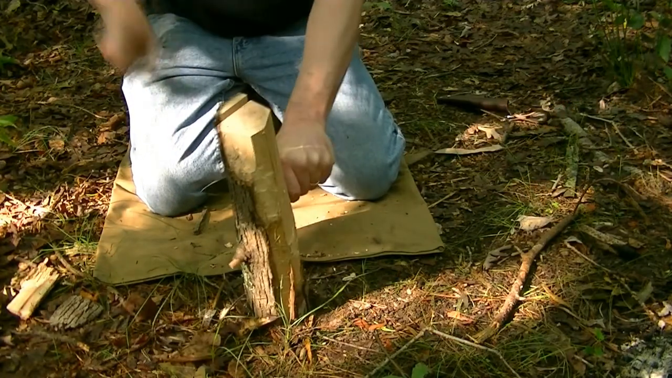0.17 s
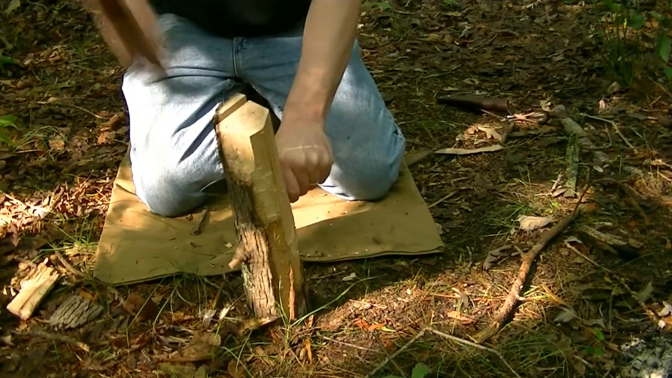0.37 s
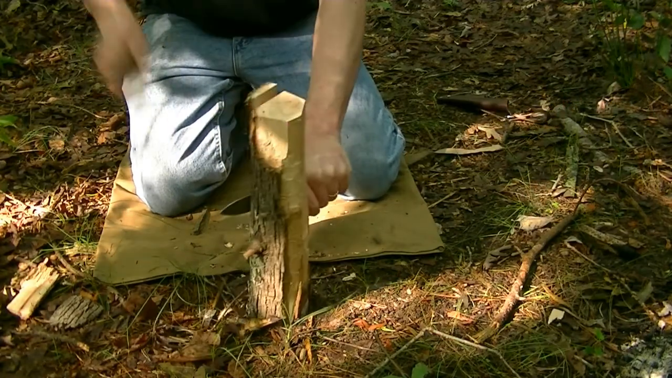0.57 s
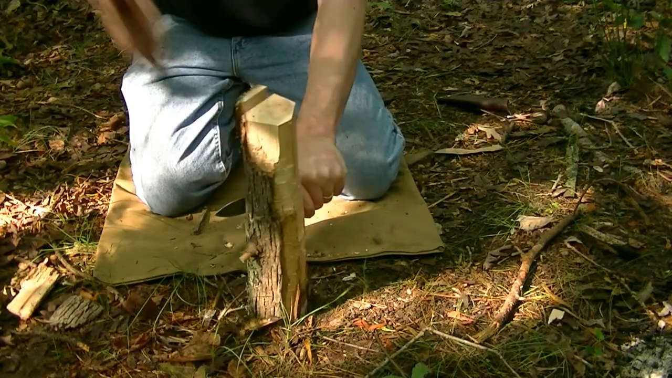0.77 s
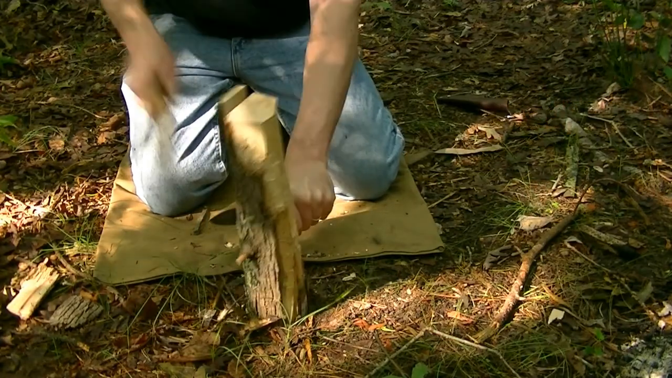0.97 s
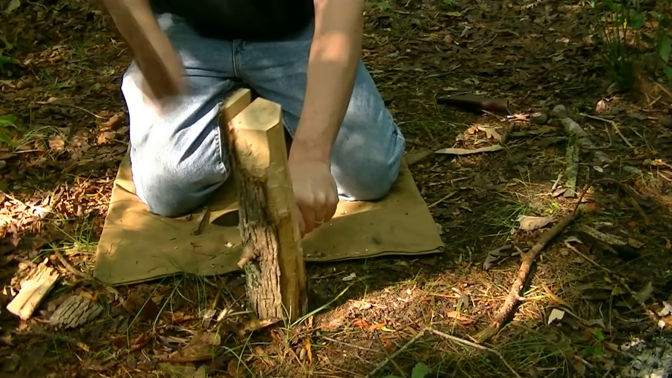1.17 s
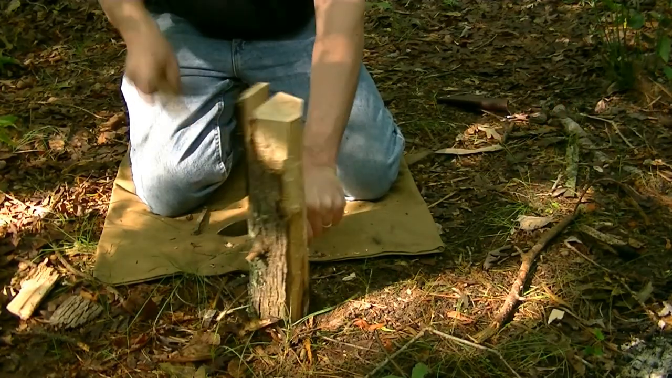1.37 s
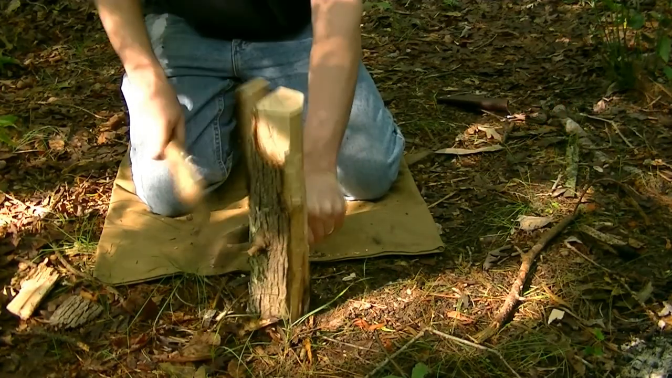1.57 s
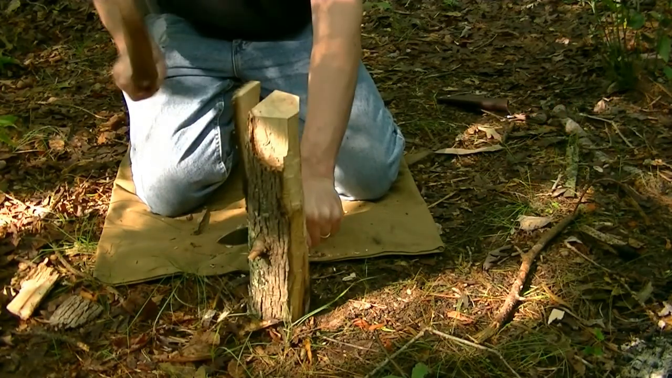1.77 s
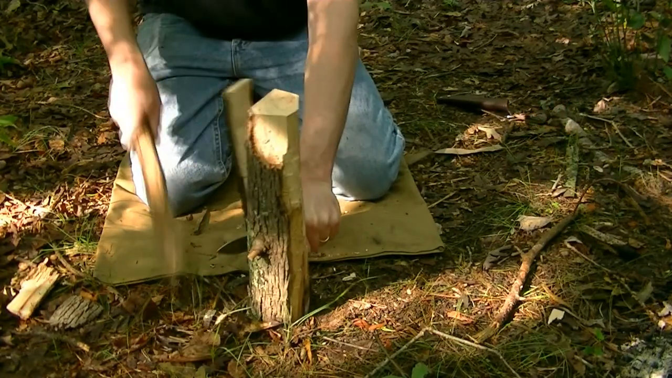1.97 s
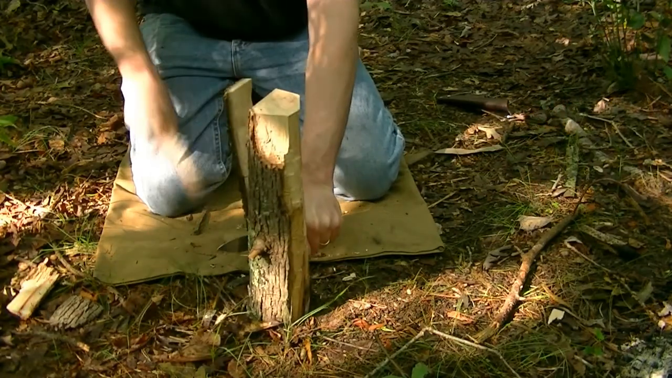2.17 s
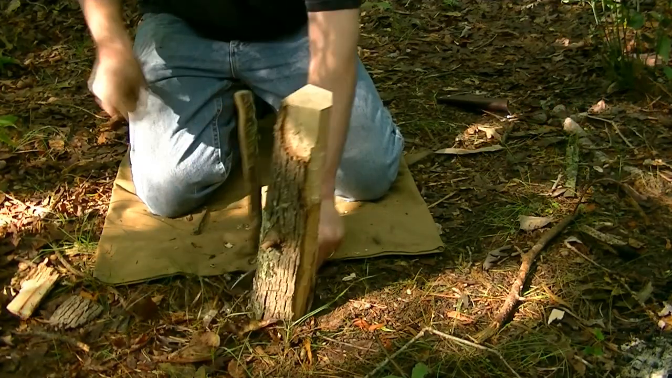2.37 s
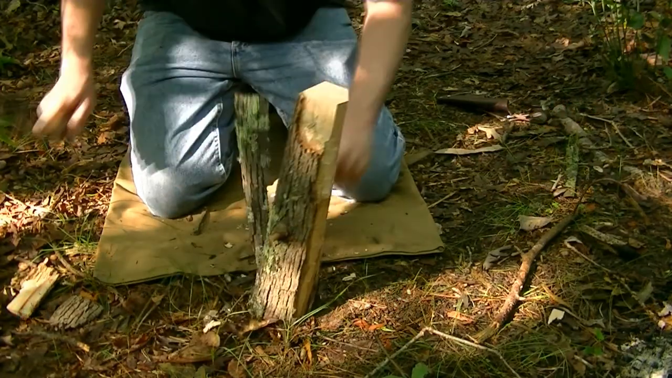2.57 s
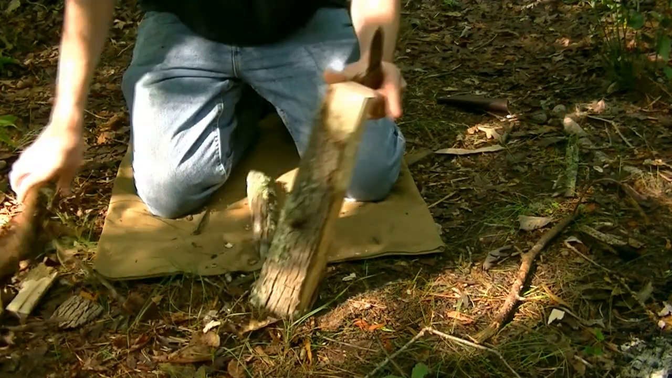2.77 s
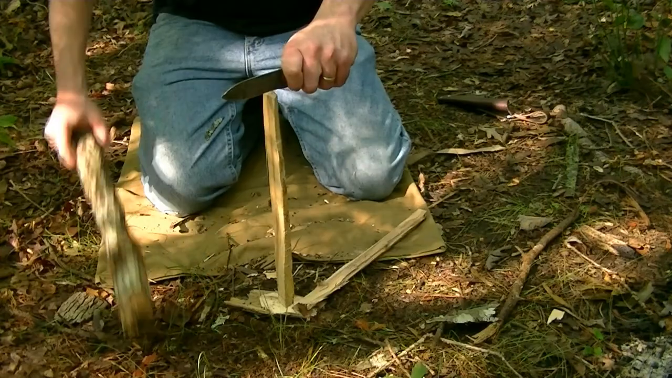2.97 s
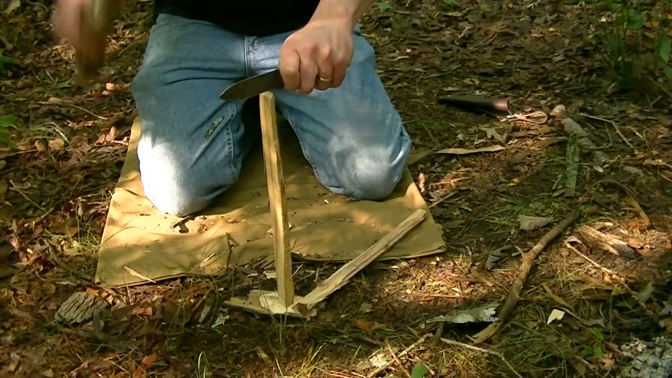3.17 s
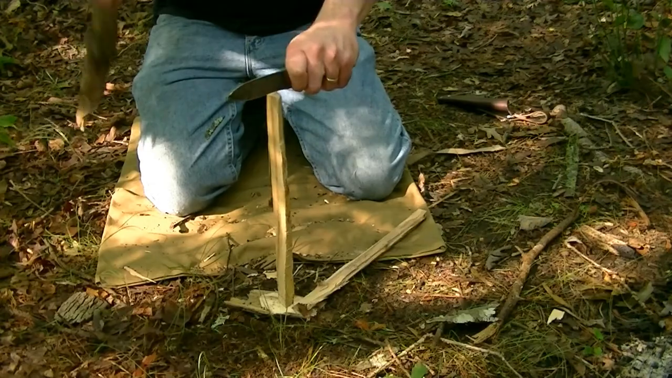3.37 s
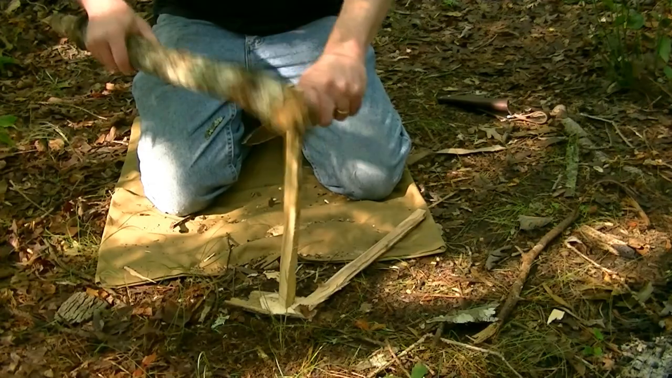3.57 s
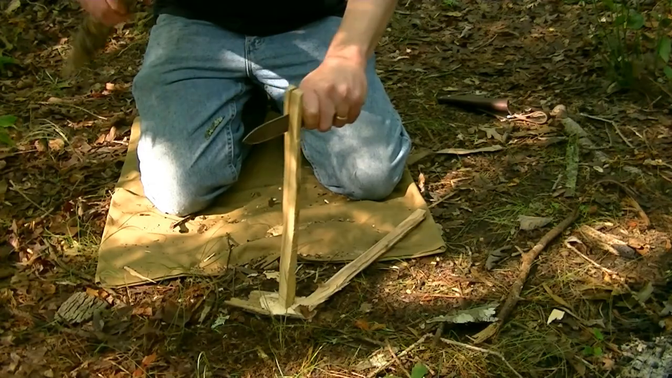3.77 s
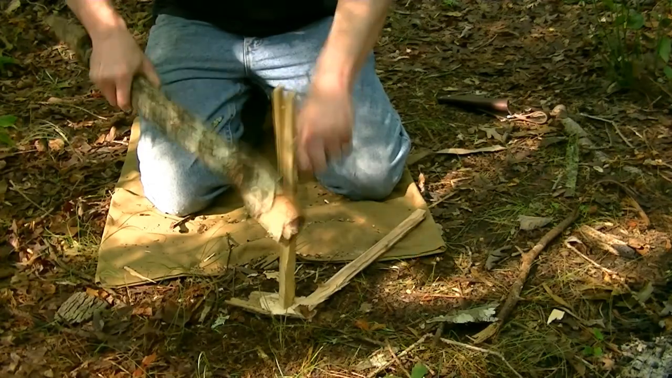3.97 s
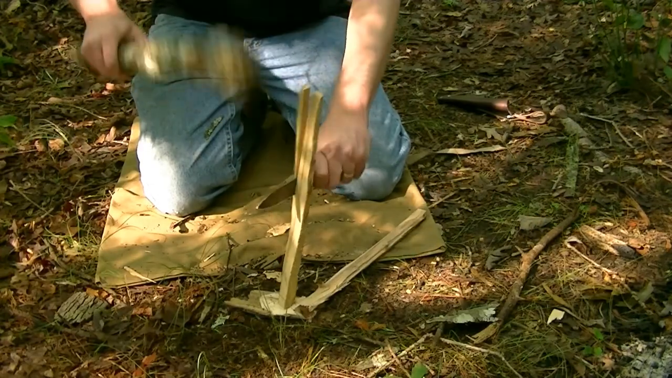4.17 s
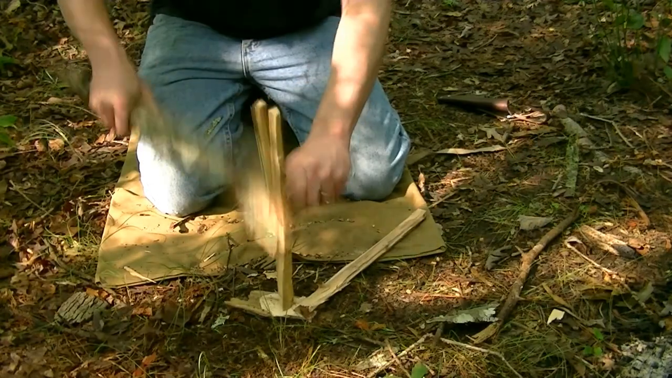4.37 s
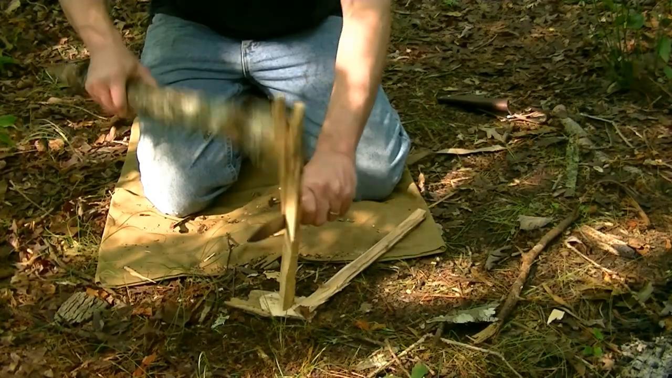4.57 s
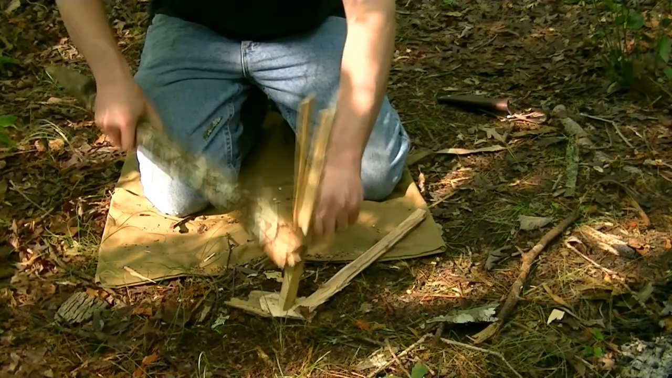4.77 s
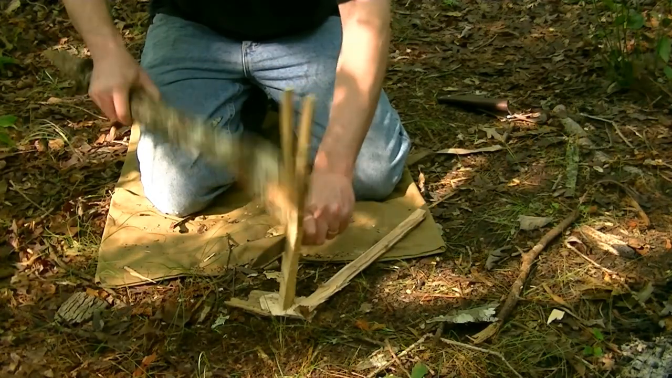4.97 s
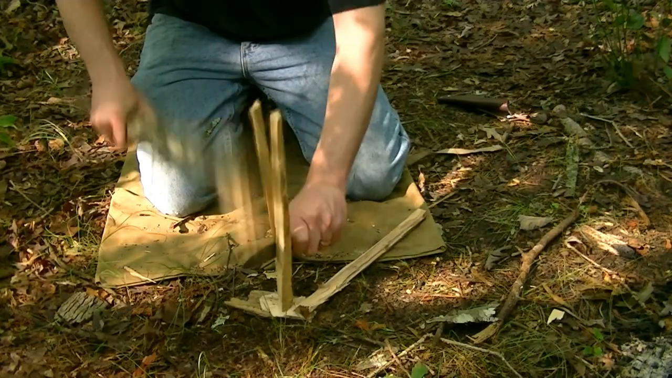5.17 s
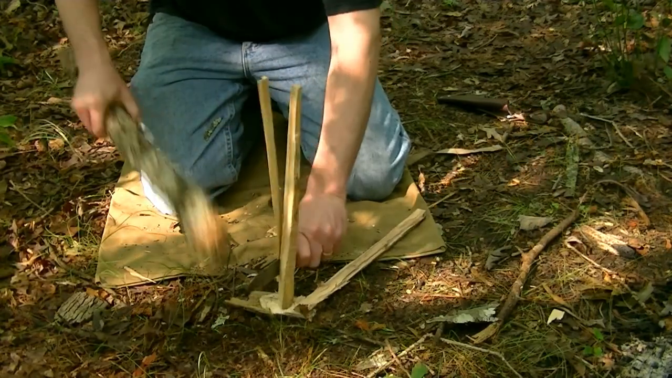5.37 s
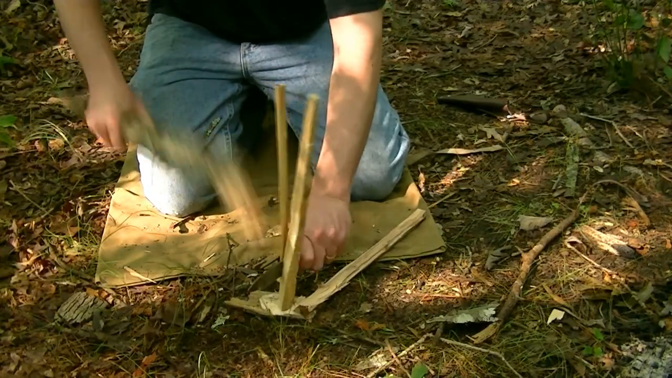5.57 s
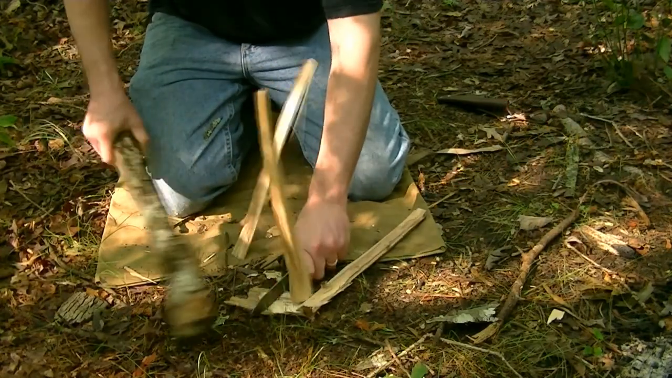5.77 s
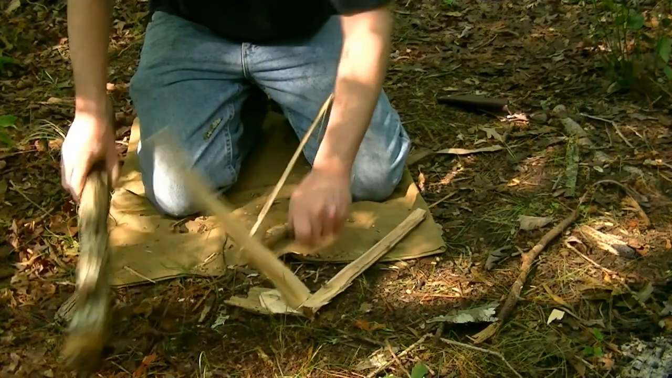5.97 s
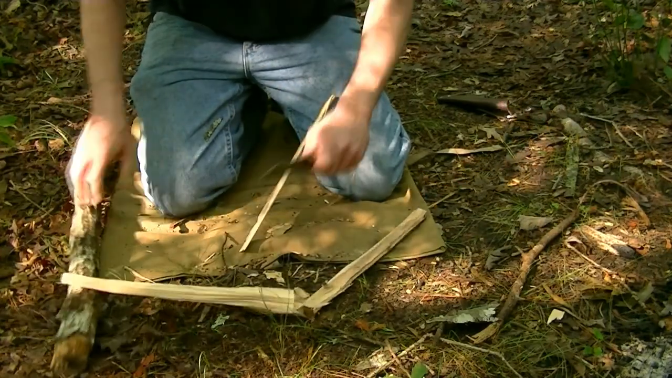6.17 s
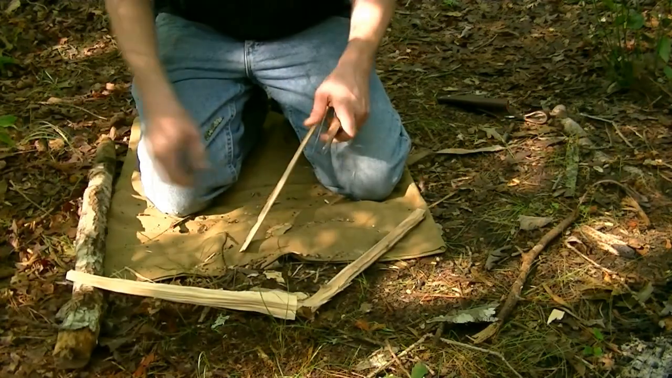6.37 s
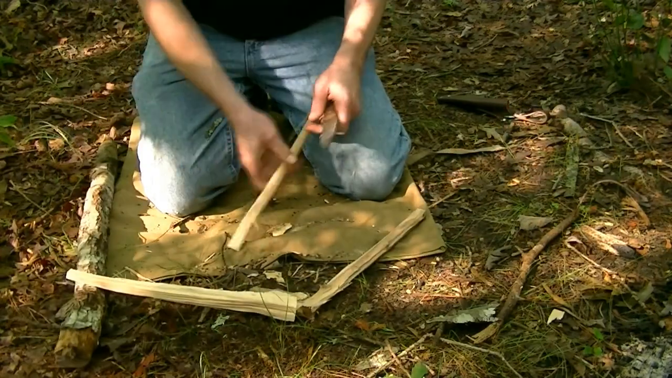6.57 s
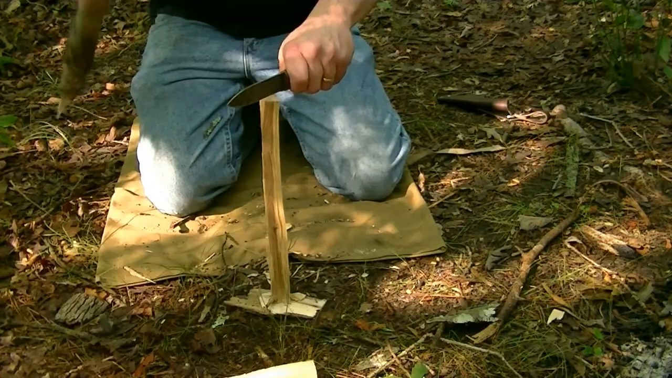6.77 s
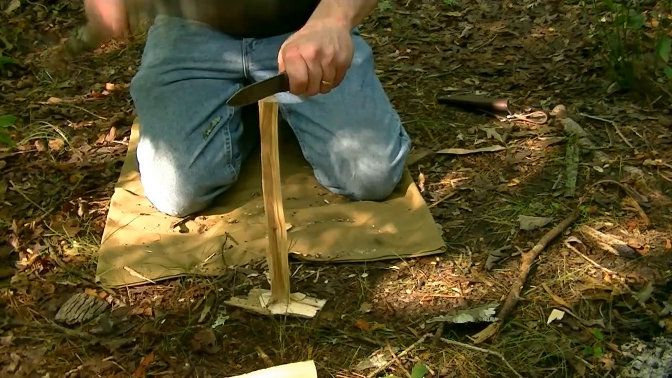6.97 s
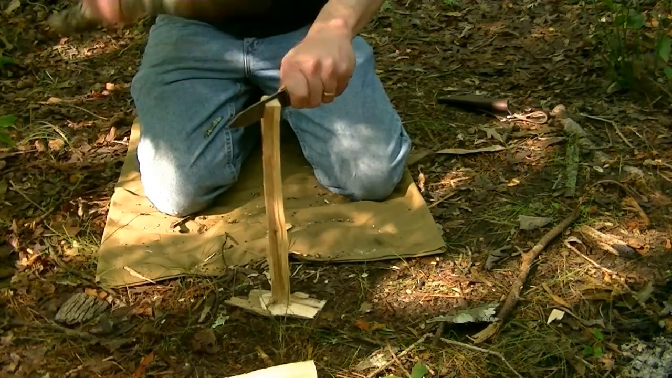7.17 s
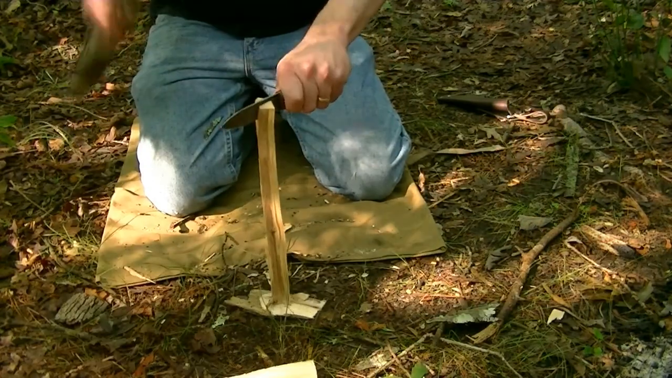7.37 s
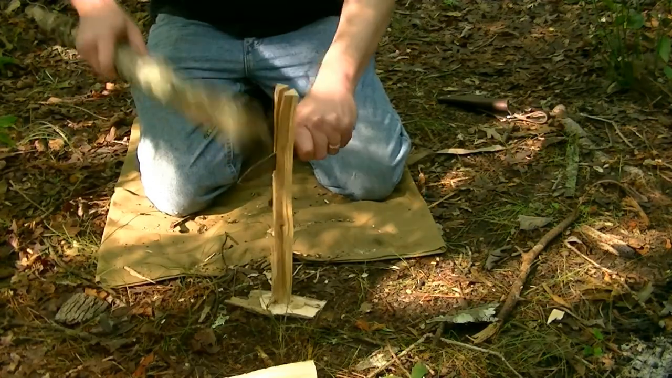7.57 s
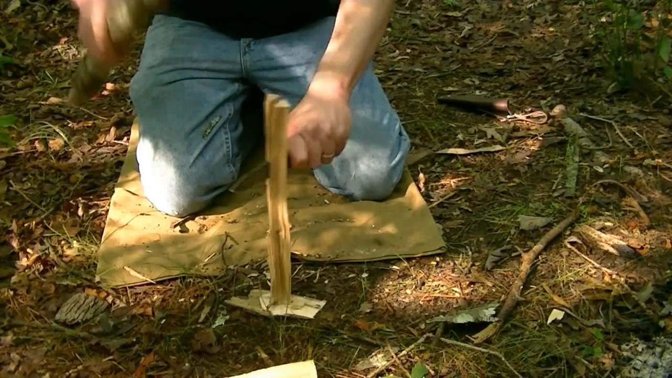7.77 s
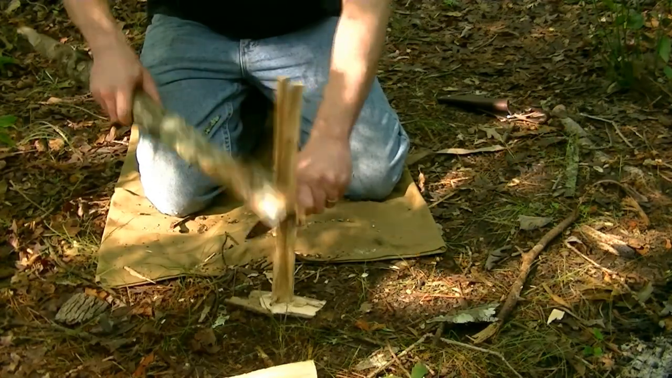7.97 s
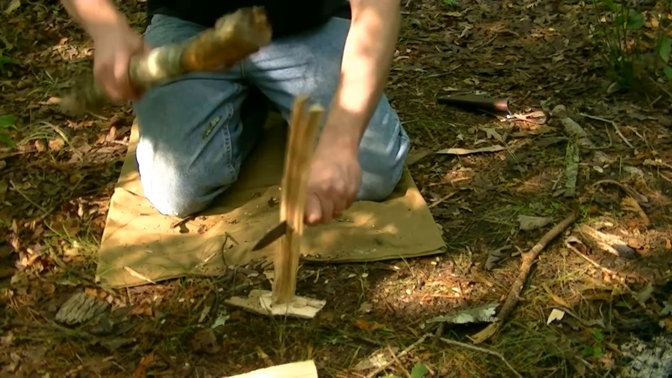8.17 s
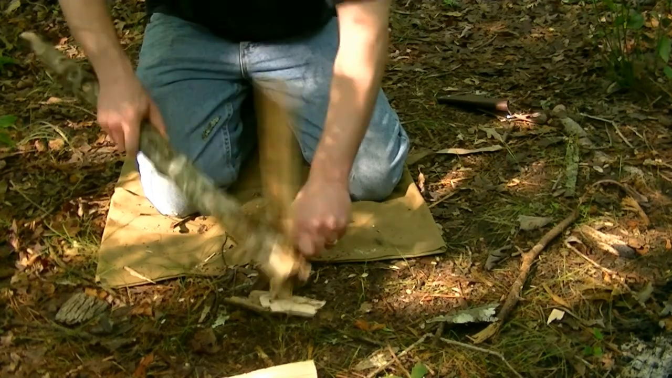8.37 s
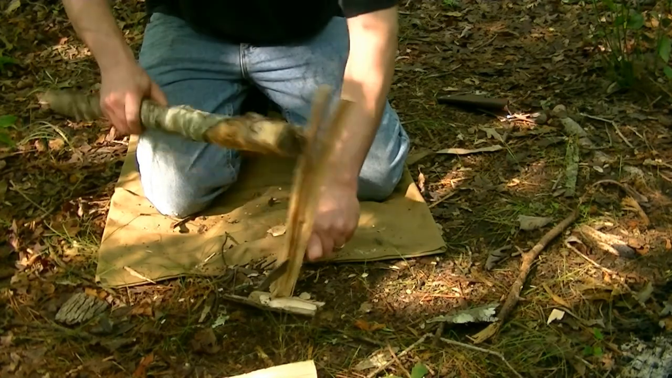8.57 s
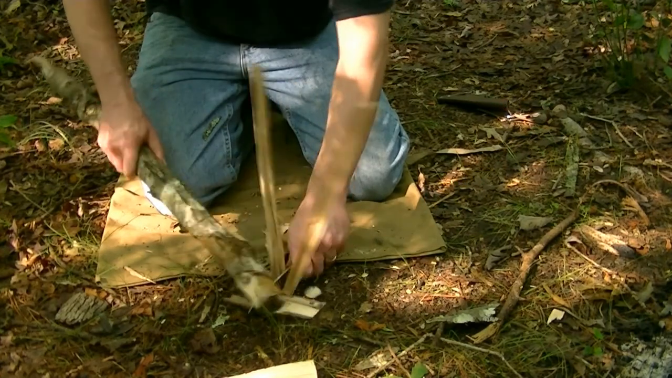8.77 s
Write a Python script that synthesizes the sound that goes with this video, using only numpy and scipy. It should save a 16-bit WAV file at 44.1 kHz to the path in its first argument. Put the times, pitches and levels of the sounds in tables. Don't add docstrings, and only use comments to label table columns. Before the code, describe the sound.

Dry woody whacks, loud and near, with a sharp click and short hollow knock, repeat in steady rhythm. First a log splits and drops with a soft ground thump; then slimmer sticks give crisper tocks with crackling, tearing splinters. Loose halves tumble and knock between the series. Outdoors among trees, each hit leaves a brief diffuse echo. A high, steady insect shimmer continues, losing its broader layer when the log work ends. Close, slightly overloaded camera microphone.

```python
import sys
import numpy as np
from scipy import signal
from scipy.fft import rfft, irfft, next_fast_len
from scipy.io import wavfile
from scipy.ndimage import uniform_filter1d

SR = 44100
rng = np.random.default_rng(int(sys.argv[2]) if len(sys.argv) > 2 else 0)


def pcm_store(signal):
    levels = np.round(np.clip(np.atleast_2d(signal), -1, 1) * 32767)
    wavfile.write(sys.argv[1], SR, levels.astype(np.int16).T)


def gain_from_db(level_db):
    decades = np.asarray(level_db, float) / 20
    return 10 ** decades


N = 389403

# start_s, middle_modes_energy_db, own_ring_hz, low_re_middle_db, high_re_middle_db
LOG_BLOWS = [
    (0.0028, 7.5, 1846, 13.5, 10),
    (0.4127, 16.5, 3186, -10.5, -0.6),
    (0.8305, 21.5, 1407, -22, -6.5),
    (1.2015, 7, 1340, -35, -3.5),
    (1.206, 12.5, 1980, 2, 3),
    (1.5525, 12, 1680, 8, 7.5),
    (1.8615, -6.5, 2920, 5, 1.5),
    (1.8665, 13, 1180, 1, 3.5),
    (2.1825, -13, 1460, -43.5, -8),
    (2.1897, 11, 1530, 4.5, 6),
]
STICK_BLOWS = [(3.4688, 20, 1304, -8.5, -25), (3.932, 5, 1548, -16.5, 13), (4.3716, 7, 1172, 4, 8.5),
               (4.7595, 8.5, 743, 5.5, -3.5), (5.2018, 11.5, 1260, -4, 2), (5.6117, 11.5, 1370, -1.5, 8),
               (6.9777, 14.5, 1266, -8, -4.5), (7.4012, 9, 1244, 4.5, 2.5), (7.83, 12, 1695, -11, -2.5),
               (8.2548, 7.5, 1150, 0.5, -0.5), (8.6808, 6.5, 1060, 7, -41)]
KNOCKS = [(0.904, -22, 1490, -3.5, -18), (2.2362, -29, 546, 9.5, -12), (2.283, -36, 580, 11, -7),
          (2.3133, -27.5, 1040, -7, -12), (2.716, -19, 2480, 4, 1), (2.7215, -14, 812, 13, 7.5),
          (2.7958, -21, 2760, 13, -1), (2.9105, -33, 1550, 20.5, 2), (5.101, -35, 3094, -15, 15),
          (5.1173, -26.5, 615, 14, 8), (5.1348, -33.5, 3150, 6, 6), (8.237, -10, 1285, -6.5, -16.5),
          (8.3703, -25, 3255, -7, 1), (8.6975, -22, 1480, 10.5, -11), (8.754, -41.5, 2400, 4, 14.5),
          (5.625, -8, 924, -0.5, -6), (5.726, -45, 895, 18.5, -11), (5.748, -29, 707, 5.5, 2),
           (5.773, -27.5, 1114, -2, -4), (5.8925, -35.5, 600, 8, 3.5), (5.986, -39.5, 1205, 9, 6),
           (6.0081, -10, 750, -2, -29), (6.0423, -27, 756, 12, -6), (6.047, -20.5, 1200, -15, 3),
           (6.093, -33.5, 440, 12.5, -1), (6.134, 2.5, 1252, -22, -18), (6.144, -20.5, 1210, 6, 4),
           (6.2072, -19, 1146, -6, -9), (6.582, -48.5, 503, 14.5, 7.5)]
# pitch_hz, width_hz, level_db
LOG_RESONANCES = [(610.4, 160, -11), (733, 790, 15.5), (973, 490, 1.5), (1357, 750, -4), (1705, 170, -0.5),
                  (2300, 530, -1.5), (2820, 150, -4.5), (3250, 430, -4), (3870, 890, -9)]
# pitch_hz, width_hz, level_db
STICK_RESONANCES = [(474, 75, 1), (775, 77, -5.5), (970, 580, 11), (1280, 79, -4), (1830, 170, 2),
                    (2030, 1300, 14.5), (2223, 290, -7), (2800, 360, 3.5)]
# pitch_hz, width_hz, level_db
OFFCUT_RESONANCES = [(303, 190, 10), (450, 28, -1), (743, 65, -1.5), (1200, 83, -1.5), (1556, 190, -1),
                     (2080, 490, 6), (2700, 370, 5.5), (3150, 160, 5.5)]
GROUP_BORDERS = (950, 1900)
# start_s, pitch_hz, energy_db
LOG_MODES = [(.0035, 280, -5.5), (.0035, 720, -3.5), (.0035, 1044, -9.5), (.0035, 1890, 1),
             (.0035, 2700, 0.5), (.0035, 3000, 1.5), (.0035, 3563, 2), (.4128, 870, 7.5),
             (.4132, 1720, 5.5), (.4145, 2960, 8.5), (.4178, 1467, 1.5), (.8312, 777, -6),
             (.8312, 1020, 2.5), (.8312, 1420, 9.5), (.8312, 1647, 5.5), (.8312, 2680, 9.5),
             (.8312, 3240, -9), (1.2017, 1260, 3.5), (1.2062, 730, 3.5), (1.2062, 1720, -0.5),
             (1.2062, 2080, 6), (1.2062, 2850, -6), (1.21, 1510, -12), (1.5513, 450, -8.5),
             (1.5535, 900, -1), (1.5513, 1350, 3.5), (1.5535, 1630, 4.5), (1.5539, 2200, 5),
             (1.5539, 2780, 3), (1.5565, 3200, -4), (1.867, 464, -10.5), (1.867, 750, 0), (1.867, 1170, 4),
             (1.867, 1680, 2), (1.867, 2270, 4), (1.867, 3090, -1.5), (1.867, 3600, -13), (2.1835, 1480, 2),
             (2.1835, 2700, -7.5), (2.1902, 450, -7.5), (2.1902, 770, -1), (2.1902, 1325, 6.5),
             (2.1902, 1780, 2), (2.1902, 2390, 3), (2.1902, 2770, 1.5), (2.1902, 3150, -5.5),
             (2.722, 303, -1), (2.722, 833, -9), (2.7185, 1500, -6), (2.7165, 2300, -6),
             (2.7165, 2500, -10), (2.7165, 3140, -7), (2.731, 600, -6)]
# start_s, pitch_hz, energy_db
STICK_MODES = [(3.4692, 443, 1), (3.4692, 777, -3), (3.4692, 1094, 2.5), (3.4692, 1320, 1.5),
               (3.4692, 2063, 2.5), (3.4692, 3190, -7.5), (3.9311, 432, -3.5), (3.9311, 773, -4.5),
               (3.9311, 1147, 8), (3.9311, 1630, 9.5), (3.9311, 2093, 0), (4.372, 607, -1.5),
               (4.372, 1152, 7), (4.372, 1620, 7), (4.372, 2130, 7.5), (4.372, 2830, 2.5),
               (4.7603, 754, 8.5), (4.7603, 1260, 6.5), (4.7603, 1650, -2), (4.7603, 2220, 0),
               (4.7603, 2965, -0.5), (5.2026, 720, 5), (5.2026, 1280, 7), (5.2026, 1850, -3.5),
               (5.2026, 2310, 0.5), (5.2026, 3040, -8), (5.6129, 664, 2.5), (5.6129, 1015, 0.5),
               (5.6129, 1340, 10), (5.6129, 1750, -7), (5.6129, 2335, -9), (6.1342, 824, -15.5),
               (6.1358, 1172, 1.5), (6.1358, 1590, 0), (6.1342, 2080, -11), (6.1342, 3190, -14),
               (6.9777, 491, -3), (6.9777, 1240, 13), (6.9777, 1790, -5), (6.9777, 2045, 3),
               (6.9777, 2380, -1), (7.4013, 1230, 6), (7.4013, 1640, 2), (7.4013, 2090, 6.5),
               (7.4013, 2460, -1.5), (7.8306, 450, -3.5), (7.8306, 777, 1), (7.8306, 1093, -1),
               (7.8306, 1330, -11), (7.8306, 1674, 0), (8.2549, 710, 0), (8.2549, 1250, 7.5),
               (8.2549, 1690, 0.5), (8.2549, 2600, -4), (8.2549, 3234, -11), (8.6803, 676, -3),
               (8.6803, 1010, -7), (8.6803, 1360, 1), (8.6803, 2010, -24), (8.6803, 3160, -14)]
# start_s, pitch_hz, energy_db
TOCKS = [(.4165, 2920, -16), (2.194, 1510, -5), (5.107, 3170, -15), (5.2035, 754, -3), (7.834, 1200, -9),
         (2.7975, 1337, -10.5), (2.799, 1480, -4.5), (3.9335, 794, -1), (5.95, 2080, -29),
         (6.009, 767, 1.5), (6.011, 1200, -3), (6.14, 789, -1.5), (6.142, 1480, -3), (6.135, 2120, -15),
         (6.146, 3250, -9), (6.163, 2080, -13), (6.189, 820, -18), (6.995, 1417, -14), (8.685, 471, -3.5),
         (8.698, 442, -10.5)]
# start_s, peak_db
THUDS = [(0.0028, -33), (2.1916, -28), (2.7204, -18.5), (2.724, -16.5), (2.914, -45), (3.4714, -33),
         (5.101, -34), (5.1163, -23.5), (6.0048, -30), (6.0435, -35), (6.052, -21.5), (6.978, -20),
         (7.4019, -22), (8.2565, -28.5), (8.678, -23.5), (8.697, -48)]
# start_s, peak_db, centre_hz, pan_left_minus_right_db
SNAPS = [(0.0034, -14, 6500, -3), (0.4141, -15.5, 6150, -4), (0.8308, -14, 4400, -1),
         (0.834, -16.5, 4700, 2.5), (1.2025, -13, 5640, 1), (1.2072, -17.5, 5240, -2),
         (1.5537, -11, 5350, 3.5), (1.8645, -16.5, 4500, -6), (1.869, -17.5, 4570, 6),
         (2.1826, -18.5, 6760, 3), (2.1888, -13, 4630, -1), (2.719, -25, 5900, 2), (2.7262, -30.5, 4900, 7),
         (3.4697, -20.5, 11080, -6.5), (3.472, -21.5, 6830, 13), (3.9314, -27.5, 8200, -12),
         (4.765, -22, 5400, 5), (5.2066, -26.5, 6170, -7), (5.6193, -15, 7300, -2), (6.978, -25.5, 7170, 0),
         (7.4057, -17, 5460, -2.5), (7.415, -26.5, 6700, 13), (7.4303, -32.5, 6970, 4),
         (7.8336, -22, 6920, -8), (7.8555, -19.5, 7360, -2.5), (8.257, -21, 5600, -3),
         (8.3704, -25.5, 6540, -2), (8.6826, -46, 7360, 11), (8.754, -32, 6600, -6)]
# start_s, peak_db, centre_hz
SPLINTERS = [(2.7962, -32, 4500), (3.4837, -25, 11800), (3.4925, -24, 11000), (3.9451, -30.5, 7800),
             (3.952, -27, 7940), (3.9585, -29, 5870), (3.9669, -28, 10600), (3.9858, -45, 7120),
             (4.3736, -28, 4270), (4.382, -38, 7270), (4.3867, -32, 12000), (4.7675, -25.5, 10100),
             (4.7832, -49, 11160), (4.7916, -49, 10430), (5.2103, -35, 6330), (5.2179, -24, 7900),
             (5.225, -42.5, 6400), (5.2335, -38, 7450), (5.629, -37, 7000), (6.985, -37.5, 4360),
             (7.4161, -20, 6120), (7.427, -27, 7100), (7.4363, -43.5, 8070), (7.4549, -39, 5900),
             (7.462, -38, 11200), (7.8395, -14, 6400), (7.852, -21, 5950), (7.8686, -28, 10200),
             (7.874, -32.5, 10340), (7.878, -26.5, 10100), (8.2712, -16, 9500), (8.2769, -25, 9760),
             (8.2856, -29, 8000), (8.2949, -38.5, 6600), (8.311, -36.5, 7000), (8.6863, -24, 5400),
             (8.6923, -23.5, 6200), (8.696, -22.5, 6400), (8.6992, -21.5, 11030), (8.7105, -46, 5800)]
# start_s, peak_db
TICKS = [(0.189, -38.5), (1.0279, -51), (1.9096, -31.5), (2.217, -36), (2.915, -44), (3.1636, -55),
         (3.837, -49), (4.367, -32), (4.3774, -44), (5.116, -33), (5.207, -25.5), (5.516, -50),
         (5.777, -38), (5.786, -38.5), (5.8911, -40.5), (6.005, -39.5), (8.131, -50), (8.1133, -54),
         (8.474, -59.5), (8.665, -39), (8.765, -34.5), (8.801, -41.5)]
# start_s, length_s, level_db
TEARS = [(.006, 0.032, -37), (0.402, 0.018, -52.5), (1.193, 0.0045, -39.5), (1.86, 0.032, -49),
         (2.19, 0.021, -41), (2.722, 0.09, -44), (3.465, 0.25, -52), (3.937, 0.087, -29),
         (4.372, 0.082, -37), (4.762, 0.046, -28.5), (5.105, 0.044, -48.5), (5.206, 0.053, -39),
         (5.213, 0.22, -58.5), (5.615, 0.027, -31.5), (5.638, 0.25, -58), (5.744, 0.026, -49.5),
         (5.97, 0.21, -54.5), (6.978, 0.024, -32.5), (7.398, 0.1, -32), (7.828, 0.081, -31),
         (8.233, 0.056, -43), (8.247, 0.09, -32.5), (8.675, 0.051, -32.5)]
# pitch_hz, level_db (per Hz)
FIBRE = [(1470, -44.5), (2500, -6.5), (3260, -6.5), (4110, -20.5), (5830, -4), (8660, -12), (9890, -7.5),
         (16000, -16)]
# start_s, pitch_hz, width_hz, energy_db
FAR_RINGS = [(0.0033, 2560, 700, 15), (0.415, 2700, 900, 5), (0.832, 2250, 800, 16),
             (0.8321, 1430, 250, 11), (1.205, 2150, 900, 15.5), (1.553, 2540, 700, 14.5),
             (1.869, 2600, 457, 17), (2.189, 2664, 120, 18), (3.47, 1590, 600, 11), (3.932, 1700, 600, 9.5),
             (4.372, 2120, 670, 13), (6.979, 1760, 830, 9), (7.402, 1800, 900, 4.5)]
# pitch_hz, level_db, t60_s
TREES = [(199.8, -11, .12), (550, -4, 0.74), (1200, 1, 0.68), (1770, 5.5, 0.49), (2760, 1.5, 0.67),
         (4500, 8.5, 0.043), (8950, -18.5, 0.05)]
# pitch_hz, width_hz, level_db
CHORUS = [(3510, 630, -13.5), (6766, 520, -0.5), (6990, 390, 2.5), (10300, 3000, -26.5), (13500, 560, -25)]
# pitch_hz, level_db
CHORUS_SHAPE = [(7900, -1.5), (8600, -16), (10000, -11), (10600, -0.5)]
# pitch_hz, pulse_rate_per_s, one_pulse_s, peak_db
CRICKETS = [
    (6350, 18.17, 3.042, -60),
    (7690, 19.5, 7.1, -66),
]
# pitch_hz, level_db (per Hz)
SWARM = [(2500, -13.5), (3600, -2.5), (4650, -2.5), (4900, 3), (5150, -1), (8000, -2.5), (9300, -13.5),
         (12500, -20), (15000, -41)]
# time_s, level_db
SWARM_LEVEL = [(0, -49.5), (1, -50), (2, -50), (2.94, -49.5), (2.948, -110), (8.83, -110)]
# pitch_hz, level_db (per Hz)
AIR = [(25, 18), (50, 0), (80, 3), (120, -4.5), (300, -10), (800, -11.5), (2000, -18), (3500, -15.5),
       (5500, -12.5), (7900, -19.5), (8500, -26.5), (9700, -42.5), (11000, -37), (15000, -41)]
# pitch_hz, likeness (-1 to 1)
LIKENESS = [(60, 0.34), (180, -0.62), (550, -0.62), (1650, -0.31), (4970, -0.41), (15000, 0.02)]


def rms_one(x):
    return x / np.sqrt(np.mean(x ** 2) + 1e-20)


def peak_one(x):
    return x / np.max(np.abs(x))


def energy_one(x):
    return x / np.sqrt(np.sum(x ** 2))


def in_time(rows):
    return np.interp(np.arange(N) / SR, *np.transpose(rows))


def at_hz(points, hz, column=1):
    points = np.array(points)
    return np.interp(np.log(hz), np.log(points[:, 0]), points[:, column])


def passed(x, hz, kind, order=2):
    return signal.sosfilt(signal.butter(order, hz, kind, fs=SR, output="sos"), x)


def drift(rate):
    r = np.exp(-80 * np.pi * rate / SR)
    slow = signal.lfilter([1], [1, -2 * r, r * r], rng.standard_normal(N // 40 + 2002))[2000:]
    return np.interp(np.arange(N) / 40, np.arange(len(slow)), rms_one(slow))


def ring(x, hz, width_hz):
    r = np.exp(-np.pi * max(width_hz, 5) / SR)
    w = 2 * np.pi * hz / SR
    return signal.lfilter(np.array([1, 0, -1]) * (1 - r * r) / 2, [1, -2 * r * np.cos(w), r * r], x)


def coloured(x, spectrum):
    hz = np.maximum(np.fft.rfftfreq(x.shape[-1], 1 / SR), 10)
    return irfft(rfft(x) * gain_from_db(at_hz(spectrum, hz)), x.shape[-1])


def add(out, sound, s, pan_db):
    at = round(s * SR)
    sound = sound[..., :N - at]
    out[:, at:at + sound.shape[-1]] += sound * gain_from_db([[pan_db / 2], [-pan_db / 2]])


def blows(table, modes, chatter, chatter_s, echo_s, own_db, own_width_hz, pan_db, ground_db, far_db, near_db):
    near, far = np.zeros((2, N)), np.zeros((2, N))
    t = np.arange(SR // 5) / SR
    u = (t - .0017) / .00009
    click = np.exp(-u ** 2) - .55 * np.exp(-(u + 3.6) ** 2 / 2)
    for s, energy_db, hz, low_db, high_db in table:
        draws = rng.standard_normal((len(modes) + 2, len(t)))
        fade = np.minimum(t / 0.0013, 1) * np.exp(-(t / chatter_s) ** 1.1)
        ground_echo = 0.41 * np.interp(t - echo_s * (1 + 0.16 * draws[0, 0]), t, click)
        force = click + ground_echo + chatter * draws * np.abs(draws[-1]) * fade
        groups = np.zeros((3, len(t)))
        for k, (mode_hz, width_hz, db) in enumerate([(hz, own_width_hz, own_db)] + modes):
            mode_hz *= 1 + .025 * draws[1, k] * (k > 0)
            sound = energy_one(ring(force[k], mode_hz, width_hz))
            groups[np.searchsorted(GROUP_BORDERS, mode_hz)] += gain_from_db(db) * sound
        bands_hz = (350, 950), (950, 2100), (1600, 3600)
        for group, db, edges in zip(groups, (low_db, 0, high_db), bands_hz):
            add(near, gain_from_db(energy_db + db + near_db) * energy_one(group), s, pan_db * (edges[0] > 900))
            smooth = energy_one(passed(np.diff(click, prepend=0), edges, "band", order=1))
            add(far, gain_from_db(energy_db + db + far_db) * smooth, s, 0)
        add(near, thump(energy_db + ground_db, draws[-1]), s, .3)
    return np.array([near, far])


def struck(table, rise_s, die_s, pan_db):
    out, t = np.zeros((2, N)), np.arange(SR // 20) / SR
    for k, (s, hz, db) in enumerate(table):
        shape = (1 - np.exp(-t / rise_s)) * np.exp(-t / die_s * (hz / 1200) ** 0.091)
        tone = energy_one(shape * np.sin(2 * np.pi * hz * t))
        add(out, (-1) ** k * gain_from_db(db) * tone, s, pan_db * (hz > 900))
    return out


def tocks():
    out, t = np.zeros((2, N)), np.arange(SR // 10) / SR
    for s, hz, db in TOCKS:
        push = np.sin(2 * np.pi * hz * t) * np.exp(-t / 0.00051)
        width_hz = 36 * min(1, hz / 750)
        add(out, gain_from_db(db) * energy_one(ring(push, hz, width_hz)), s, 2.5)
    return out


def thump(peak_db, noise):
    ground_hz, ground_t60_s = 141.5, 0.067
    bounce_s, bounce_db = 0.032, -13.5
    t = np.arange(len(noise)) / SR
    push = np.exp(-t / 0.016) * (1 - np.exp(-t / 0.032))
    low = peak_one(ring(push, ground_hz, np.log(1000) / np.pi / ground_t60_s))
    low += gain_from_db(bounce_db) * np.interp(t - bounce_s, t, low, left=0)
    low = np.array([low, np.interp(t - 0.0005, t, low, left=0)])
    crunch = peak_one(ring(np.exp(-t / 0.028) * push ** 0.21 * noise, 170, 180))
    return gain_from_db(peak_db - 4.5) * passed(low + 0.44 * crunch, 98, "high")


def thuds():
    out = np.zeros((2, N))
    for s, peak_db in THUDS:
        add(out, thump(peak_db, rng.standard_normal(SR // 5)), s, .3)
    return out


def small_snaps():
    tick_hz, pitch_spread, side_db = 6600, 0.091, -4.5
    rows = []
    for s, db in TICKS:
        a, b = rng.standard_normal(2)
        rows.append((s, db, tick_hz * np.exp(pitch_spread * a), side_db * b))
    for s, db, hz in SPLINTERS:
        rows.append((s, db - 0.5, hz, side_db * rng.uniform(-1, 1)))
    return rows


def snaps():
    out, t = np.zeros((2, N)), np.arange(SR // 50) / SR
    for s, peak_db, hz, pan_db in SNAPS + small_snaps():
        burst = np.exp(-t / 0.0015) * np.minimum(t / .0003, 1)
        mid, side = rng.standard_normal((2, len(t))) * burst
        bright = passed(mid + 0.55 * side * [[1], [-1]], [3500, 12500], "band", order=3)
        bright += passed(bright, 10500, "high") * [[-.15], [.15]]
        sound = peak_one(peak_one(bright) + 1.1 * peak_one(ring(mid, hz, 780)))
        add(out, gain_from_db(peak_db + 5.0) * sound, s, pan_db)
    return out


def tearing():
    t, level = np.arange(N) / SR, np.zeros(N)
    for s, length, db in TEARS:
        u = (t - s) / length
        level += gain_from_db(db) * np.clip(u * 16, 0, 1) * np.exp(-np.clip(u, 0, 9) ** 2 * 6.2)
    size = next_fast_len(N)
    strength = gain_from_db(3 * np.minimum(rng.exponential(1, size), 4))
    present = rng.random(size) < 9000 / SR
    grains = rng.standard_normal((2, size)) * strength * present
    mid, side = rms_one(coloured(grains, FIBRE))[:, :N]
    return level * gain_from_db(3.2 * drift(100)) * (mid + .4 * side * [[1], [-1]]) * gain_from_db([[.8], [-.8]])


def far_rings():
    out, click = np.zeros((2, N)), np.r_[1., np.zeros(SR // 10)]
    for s, hz, width_hz, db in FAR_RINGS:
        add(out, gain_from_db(db) * energy_one(ring(click, hz, width_hz)), s, 0)
    return out


def trees(x):
    t = np.arange(SR * 3 // 4) / SR
    tail, edges = 0, 150 * 2 ** np.arange(0, 6.6, .5)
    for low, high in zip(edges, edges[1:]):
        hz = np.sqrt(low * high)
        band = passed(rng.standard_normal((2, len(t))), [low, high], "band")
        flutter = rms_one(uniform_filter1d(rng.standard_normal(len(t)), size=400))
        fall_db = 60 * t / at_hz(TREES, hz, column=2)
        tail = tail + band * gain_from_db(2.0 * flutter + at_hz(TREES, hz) - fall_db)
    tail = tail * (1 - np.exp(-(t / 0.015) ** 2))
    tail = tail * (1 + 0.62 * np.exp(-((t - .068) / 0.0028) ** 2))
    tail = gain_from_db(-27.5) * tail / np.sqrt(np.sum(tail[0] ** 2))
    return signal.fftconvolve(x.mean(axis=0, keepdims=True), tail, axes=1)[:, :N]


def surround(colour):
    points = np.array(LIKENESS)
    alike = np.clip(points[:, 1], -.9, .9)
    side_db = np.c_[points[:, 0], 10 * np.log10((1 - alike) / (1 + alike))]
    mid, side = colour(rng.standard_normal((2, next_fast_len(N))))
    side = coloured(side, side_db)
    return (mid + side * [[1], [-1]])[:, :N] / np.std(mid)


def chorus():
    def sing(noise):
        song = sum(gain_from_db(db) * ring(ring(noise, hz, w), hz, w) for hz, w, db in CHORUS)
        return coloured(song, CHORUS_SHAPE)
    return gain_from_db(-54 + 1.3 * drift(13) + 0.88 * drift(90)) * surround(sing)


def crickets():
    t, out = np.arange(N) / SR, 0
    for hz, rate, s, db in CRICKETS:
        tone = np.sin(2 * np.pi * hz * t + 2 * drift(30))
        pulses = np.cos(np.pi * rate * (t - s) + .3 * drift(1)) ** 6
        out = out + gain_from_db(db + 3.9 * drift(8)) * tone * pulses
    return out


def swarm():
    return gain_from_db(in_time(SWARM_LEVEL) + .7 * drift(8)) * surround(lambda noise: coloured(noise, SWARM))


def air():
    level = gain_from_db(-53.5 + 1.0 * drift(3.2))
    return level * surround(lambda noise: coloured(noise, AIR)) * gain_from_db([[.4], [-.4]])


def scene():
    clatter_db = -12
    log = blows(LOG_BLOWS, LOG_RESONANCES, chatter=0.92, chatter_s=0.0054, echo_s=0.0032,
                own_db=-5.0, own_width_hz=130, pan_db=5.0, ground_db=-55, far_db=-11, near_db=clatter_db)
    sticks = blows(STICK_BLOWS, STICK_RESONANCES, chatter=0.44, chatter_s=0.0047, echo_s=0.002,
                   own_db=-13.0, own_width_hz=280, pan_db=5.0, ground_db=-35.0, far_db=-13.5,
                   near_db=clatter_db)
    pieces = blows(KNOCKS, OFFCUT_RESONANCES, chatter=0.88, chatter_s=0.0082, echo_s=0.00213,
                   own_db=5.0, own_width_hz=33, pan_db=4.5, ground_db=-33.5, far_db=0.5, near_db=3.4)
    near, far = log + sticks + pieces
    modes = struck(LOG_MODES, rise_s=0.001, die_s=0.0016, pan_db=3.5)
    modes += struck(STICK_MODES, rise_s=0.00051, die_s=0.0032, pan_db=2.5)
    fibres = snaps() + tearing()
    woods = trees(far + fibres) + trees(far_rings()) + trees(gain_from_db(-9) * modes)
    close = near + modes + tocks() + thuds() + fibres
    return close + woods + chorus() + crickets() + swarm() + air()


def band_limit(x):
    return signal.sosfilt(signal.butter(12, 16800, fs=SR, output="sos"), x)


def record(dry):
    loud = passed(passed(dry, 14600, "low", order=8), 110, "high", order=3)
    loud = loud + passed(loud, 11500, "high") * [[-.2], [.2]]
    rounded = loud / (1 + np.abs(loud / .9) ** 5) ** (1 / 5)
    finished = signal.sosfilt(signal.cheby2(10, 60, 16950, fs=SR, output="sos"), rounded)
    return band_limit(finished)


dry = scene()
out = record(dry)
pcm_store(out)
```